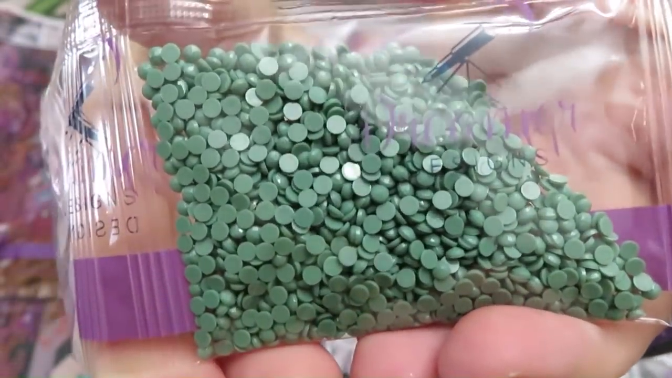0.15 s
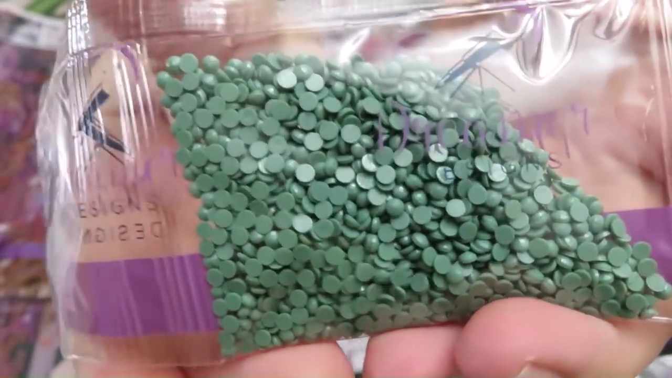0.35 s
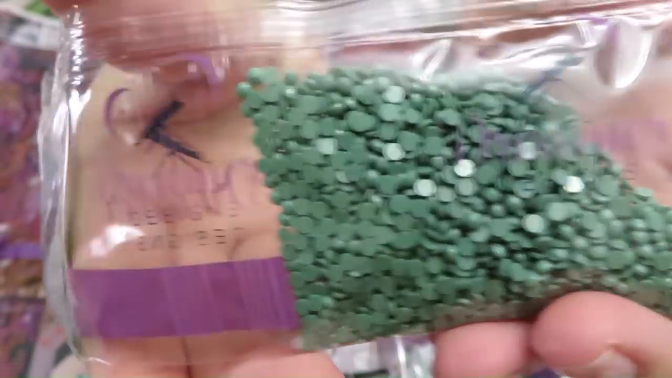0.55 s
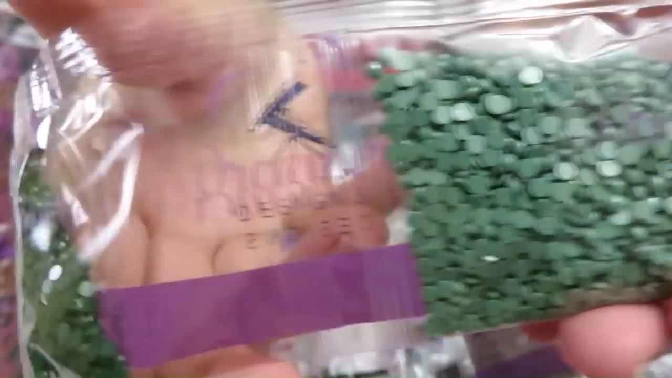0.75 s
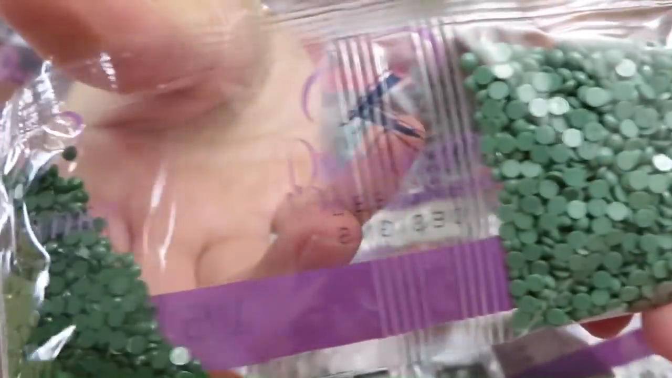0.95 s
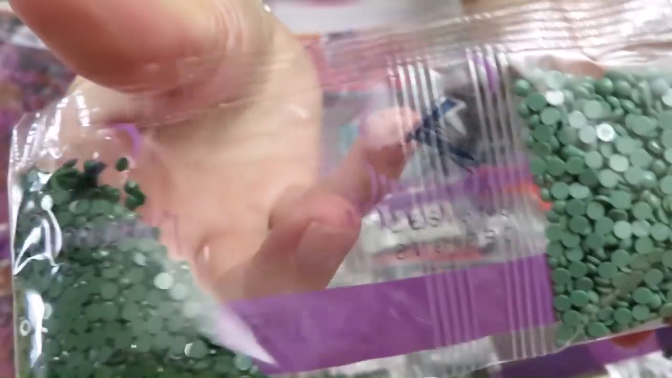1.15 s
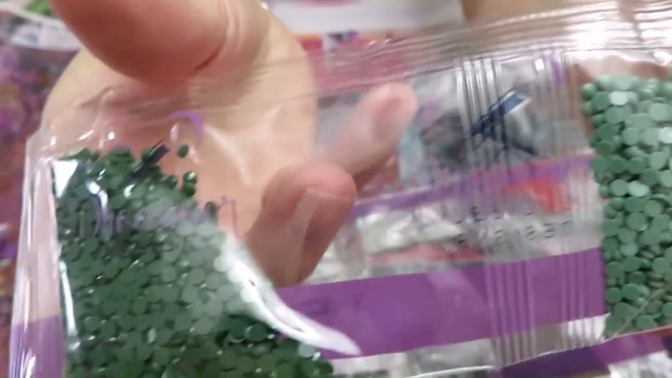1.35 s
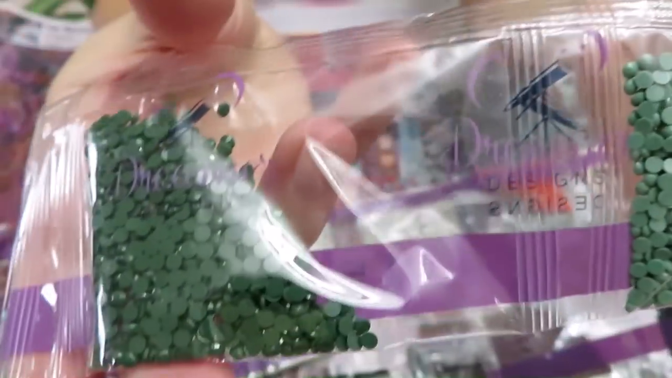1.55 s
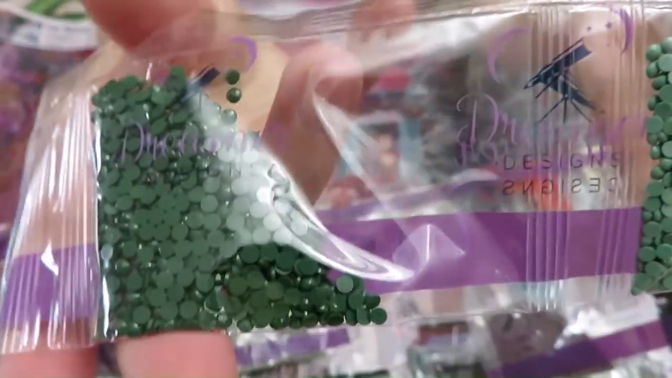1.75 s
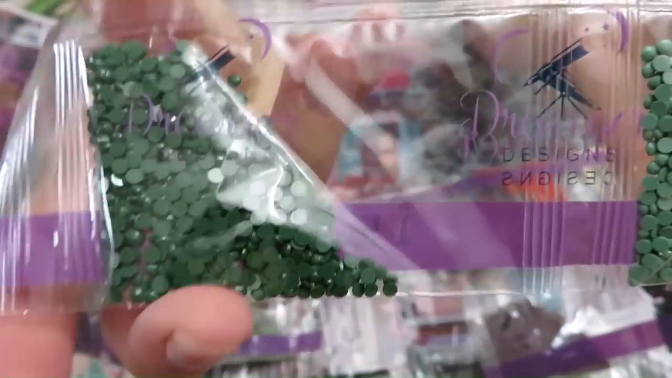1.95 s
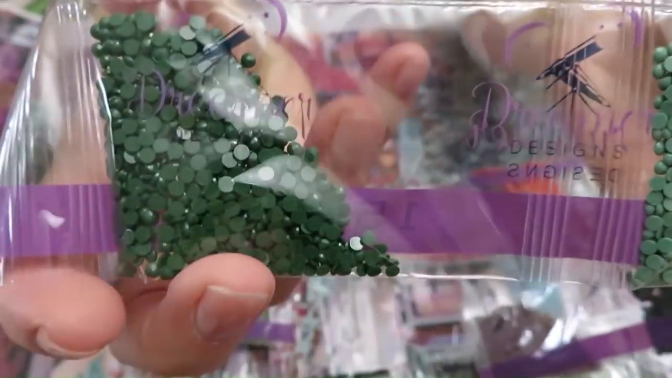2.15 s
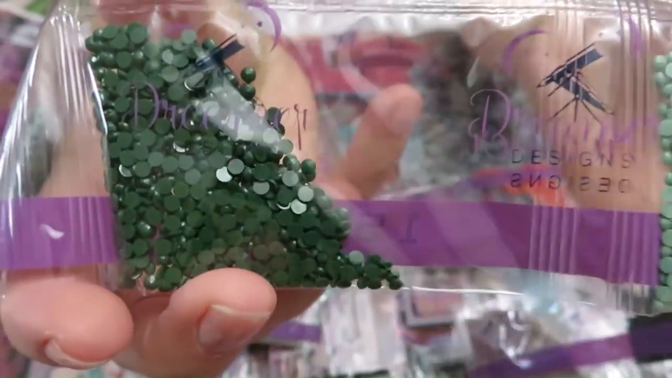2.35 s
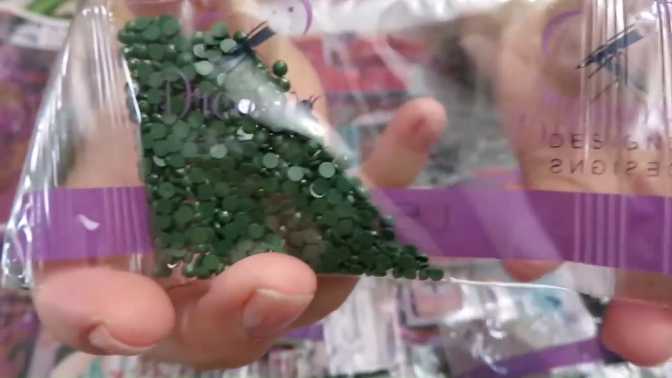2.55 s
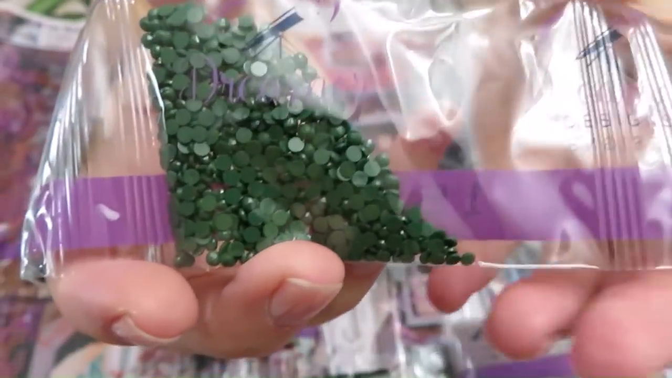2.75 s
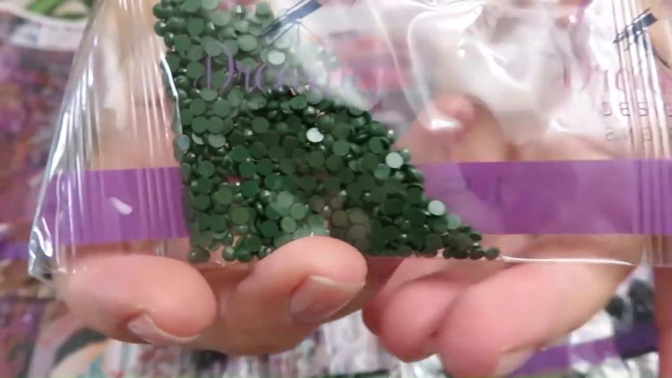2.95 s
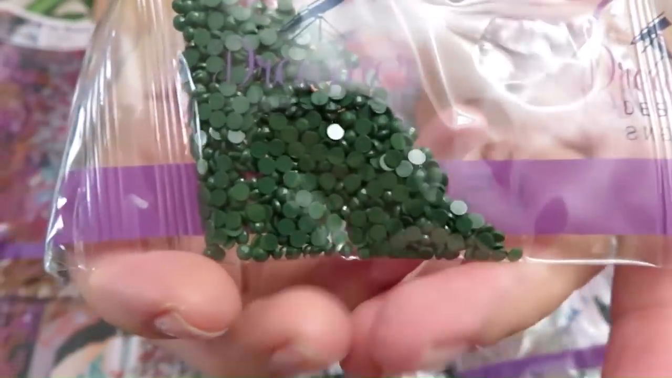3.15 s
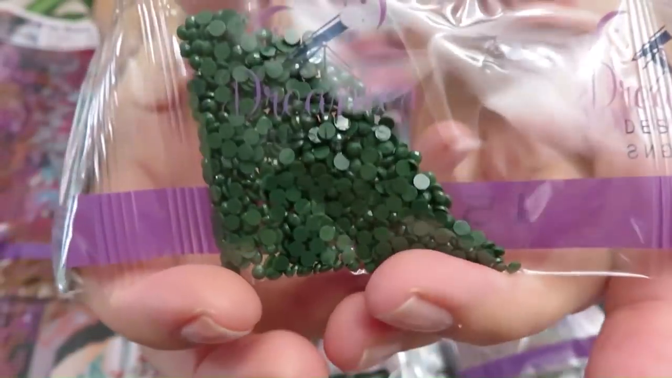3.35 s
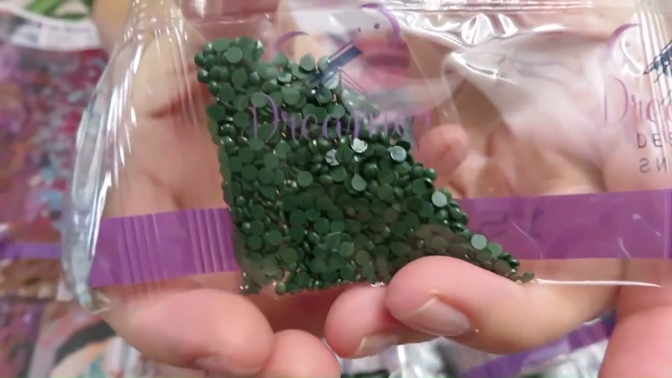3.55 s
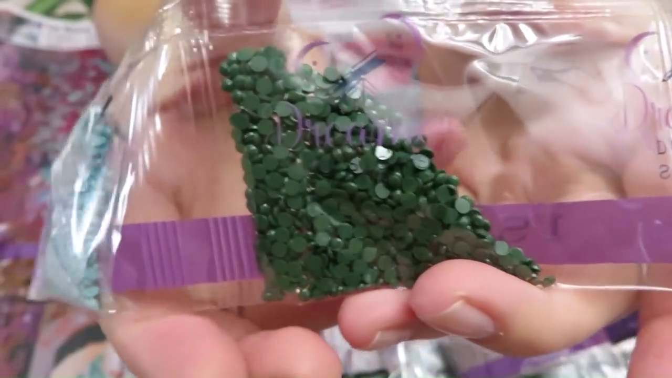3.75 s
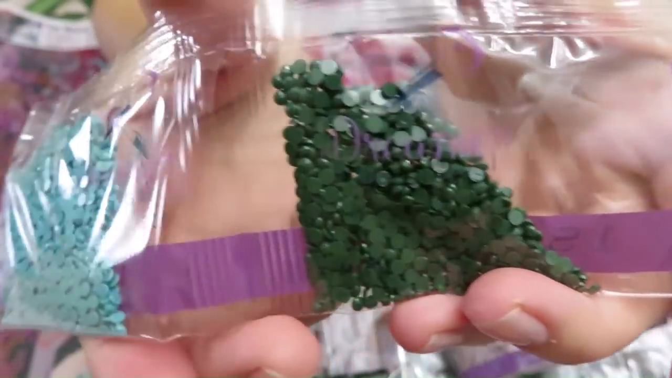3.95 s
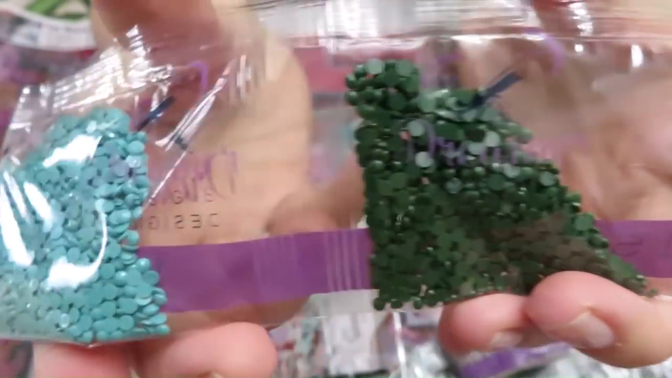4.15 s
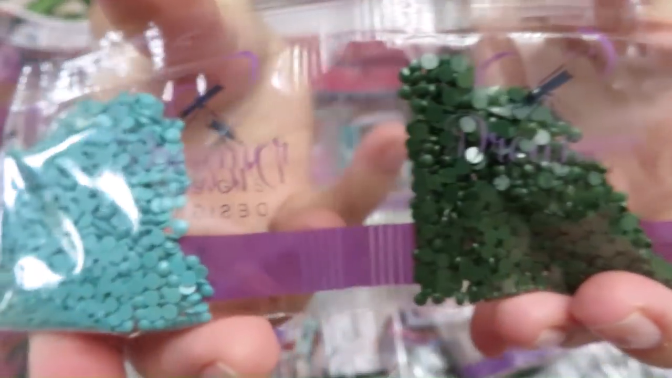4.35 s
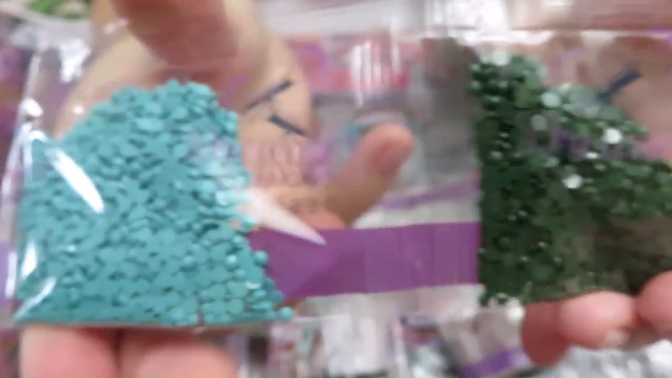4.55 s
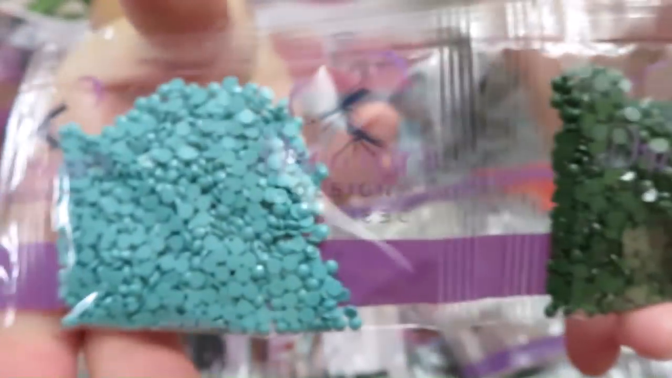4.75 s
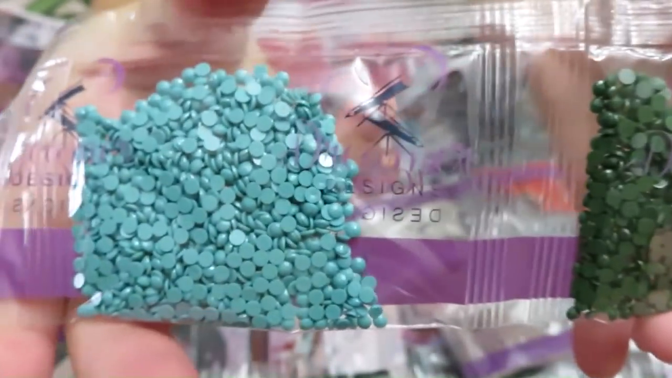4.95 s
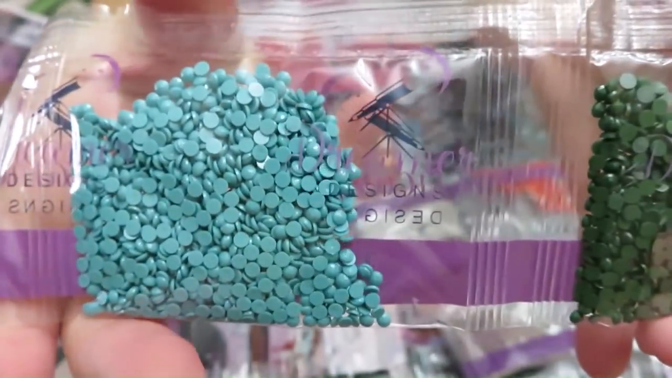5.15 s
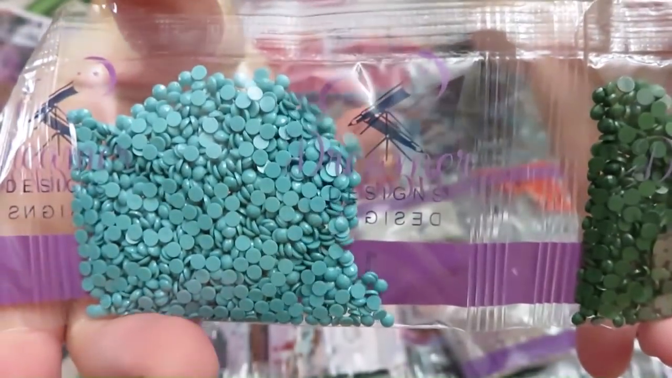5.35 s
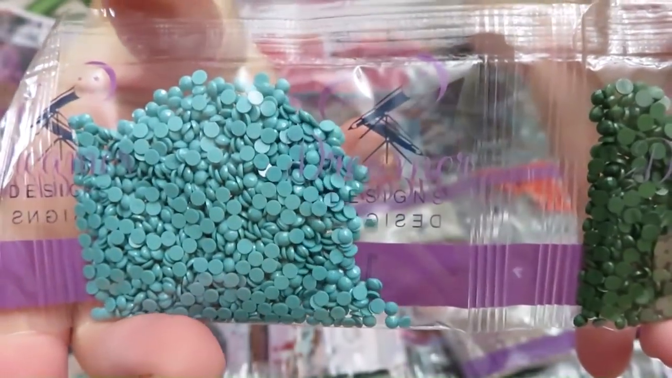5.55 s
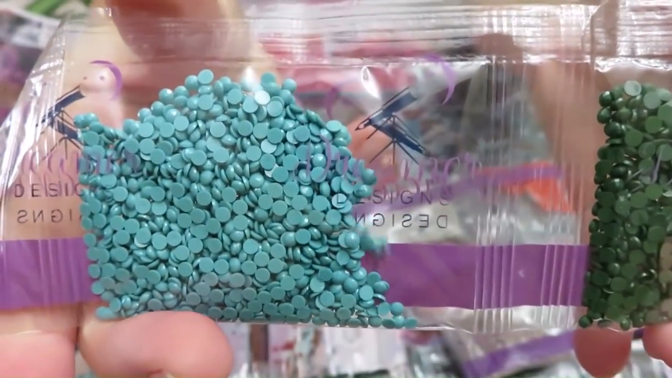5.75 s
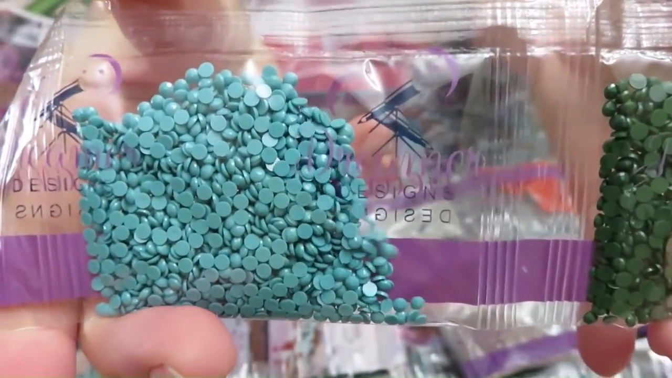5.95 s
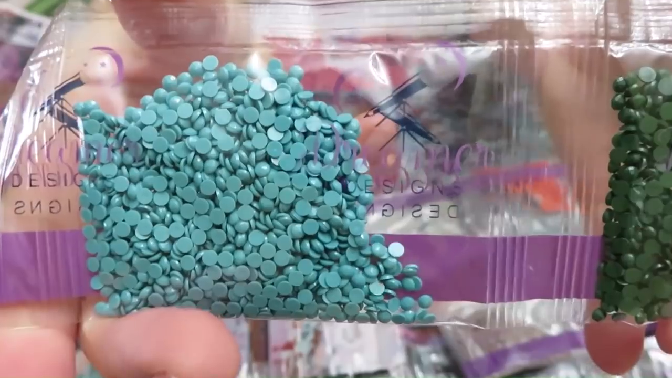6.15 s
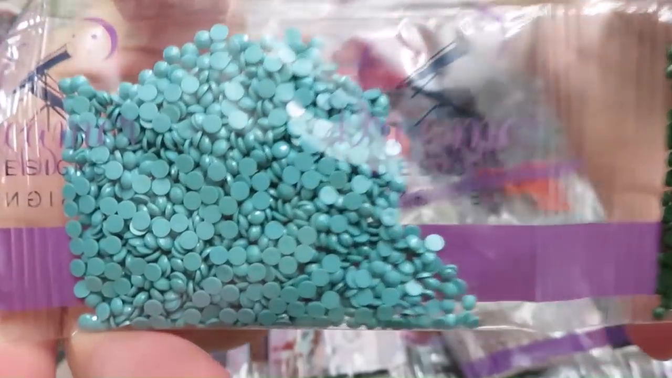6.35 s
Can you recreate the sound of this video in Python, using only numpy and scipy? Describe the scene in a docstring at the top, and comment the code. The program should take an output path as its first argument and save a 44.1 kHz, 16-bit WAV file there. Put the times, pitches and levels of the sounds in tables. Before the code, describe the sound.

Very close to the microphone, a hand pulls along a strip of thin plastic bags holding tiny resin beads. The film snaps and crackles in dense, irregular bursts, with sharp ticks, short hollow pops and soft thuds, and the beads hiss and patter faintly. It is busiest during the first three seconds, eases, flares briefly near four, then thins to isolated ticks in a small quiet room.

```python
"""Sharp ticks, short pops and soft thuds come first: creases snap through in a strip of small clear plastic bags.
The bags, filled with resin beads, are pulled along by hand close to a phone; each snap excites damped modes.
With each stroke of the hand the film crackles and the beads slide, as random impulses set resonances ringing.
Decaying noise gives the reply of a small room, above coloured noise for its air and a sine for a faint mains hum."""
import sys
import numpy as np
from scipy import signal
from scipy.fft import rfft, irfft
from scipy.io import wavfile
from scipy.ndimage import uniform_filter1d

SR = 44100
rng = np.random.default_rng(int(sys.argv[2]) if len(sys.argv) > 2 else 0)


def put_to_file(sound):
    """Save the sound as 16-bit audio at rate SR, in the file named by the first command-line argument."""
    columns = np.atleast_2d(sound).T  # one column per channel
    safe = np.clip(columns, -1, 1)
    whole_steps = np.round(safe * 32767)
    wavfile.write(sys.argv[1], SR, whole_steps.astype(np.int16))


N = 282522
TIME = np.arange(N) / SR  # s, whole scene
AGE = np.arange(2048) / SR  # s, one short sound
# reference length for burst levels, and run-up of faint noise before a tick's crack, which falls with its pop
SNAP_SECONDS = .005


def undb(db):
    """Level and amplitude: 20 dB is a factor of ten in gain."""
    return 10 ** (np.asarray(db) / 20)


def unit(x):
    """Normalisation: division by the root mean square gives rms 1."""
    return x / np.sqrt(np.mean(x ** 2))


def burst(x, db):
    """Energy level: the energy of a short sound, spread over the reference length, is scaled to this level."""
    energy = np.mean(np.sum(x ** 2, axis=-1))
    return x * undb(db) * np.sqrt(SNAP_SECONDS * SR / energy)


def add(out, sound, s):
    """Superposition: a short sound is summed in at its time."""
    start = max(int(s * SR), 0)
    part = sound[..., :N - start]
    out[:, start:start + part.shape[-1]] += part


def convolve(x, response):
    """Linear system: each sample of x launches the response; the length is kept."""
    return signal.oaconvolve(np.atleast_2d(x), np.atleast_2d(response), axes=-1)[:, :x.shape[-1]]


def colour(x, points, size=2048):
    """Minimum phase: a folded cepstrum turns a curve through (f/Hz, level/dB) into a causal filter."""
    hz, db = np.transpose(points)
    bins = np.maximum(np.fft.rfftfreq(size, 1 / SR), 1)
    gain = undb(np.interp(np.log(bins), np.log(hz), db))
    cepstrum = irfft(np.log(gain))
    cepstrum[1:size // 2] *= 2
    cepstrum[size // 2 + 1:] = 0
    return convolve(x, irfft(np.exp(rfft(cepstrum))))


def highpass(x, hz):
    """Second-order high-pass: response falls by 12 dB per octave well below hz."""
    return signal.sosfilt(signal.butter(2, hz, "high", fs=SR, output="sos"), x)


def resonate(x, hz, q):
    """Resonance: a band-pass with gain 1 at its centre and a quality factor of at least 1."""
    return signal.lfilter(*signal.iirpeak(hz, max(q, 1), fs=SR), x)


def ring(hz, t60):
    """Modal decay: a struck mode is a sine that falls by 60 dB in t60 seconds."""
    return np.sin(2 * np.pi * hz * AGE) * np.exp(-np.log(1000) * AGE / t60)


def stereo(mid, side, side_db):
    """Mid-side stereo: left and right share one part and carry the other in opposition."""
    return mid + undb(side_db) * side * np.array([[1], [-1]])


def clicks(rate, spread_db):
    """Random impulse train: many small and a few large impulses, rate per second, at rms 1."""
    place, strength, side = rng.random((int(rate * N / SR), 3)).T
    size_db = spread_db * np.minimum(-np.log(1 - strength), np.pi)
    out = np.zeros(N)
    out[(place * N).astype(int)] = np.sign(side - .5) * undb(size_db)
    return unit(out)


# spectrum of the quiet room air: f/Hz, relative level/dB
AIR_SPECTRUM = [(20, -2.5), (45, -9), (90, -4.5), (140, 1), (220, -4), (400, -6.5), (800, -12.5),
                (2000, -14), (6000, -23), (12000, -32), (16000, -42)]
AIR_DB = -50.5
HUM_HZ, HUM_DB = 124.2, -64


def background():
    """Diffuse noise: room air is alike on both sides in the bass; a steady sine is the mains hum."""
    mid, side = rng.standard_normal((2, N))
    air = unit(colour(stereo(mid, highpass(side, hz=230), side_db=-0.5), AIR_SPECTRUM))
    hum = unit(np.sin(2 * np.pi * HUM_HZ * TIME))
    return undb(AIR_DB) * air + undb(HUM_DB) * hum


# colour of the room's reply: f/Hz, relative level/dB
ROOM_SPECTRUM = [(80, -9.5), (300, -4), (700, -1), (1300, -4), (2100, -2.5), (4000, 1), (9000, 1),
                 (16000, -8)]


def room(x, t60=0.46, treble_t60=0.26, treble_hz=5000, wet_db=-11, near_s=0.014, near_db=3):
    """Reverberation: early returns from hands and table, then a furnished room's tail whose treble dies first."""
    t = np.arange(SR // 2) / SR
    noise = stereo(*rng.standard_normal((2, len(t))), side_db=-34.0)
    # filtered forwards and backwards, so that the treble subtracts in phase
    treble = highpass(highpass(noise, treble_hz)[:, ::-1], treble_hz)[:, ::-1]
    low_tail = (noise - treble) * np.exp(-np.log(1000) * t / t60)
    treble_tail = treble * np.exp(-np.log(1000) * t / treble_t60)
    near = undb(near_db) * noise * np.exp(-t / near_s)
    onset = 1 - np.exp(-t / 0.00017)
    response = colour((low_tail + treble_tail + near) * onset, ROOM_SPECTRUM)
    response = response / np.sqrt(np.sum(response ** 2) / 2)
    return undb(wet_db) * convolve(x.mean(axis=0), response)


def gesture(start, end, attack_s, release_s):
    """Exponential envelope: effort builds up, holds and dies away with these time constants."""
    attack = 1 - np.exp(-np.maximum(TIME - start, 0) / attack_s)
    return attack * np.exp(-np.maximum(TIME - end, 0) / release_s)


# movements of the hand: start t/s, end t/s, film flexing level/dB, beads sliding level/dB (before the mix in scene)
HAND_STROKES = [(0, 0.027, -39, -49), (.04, 0.103, -45, -60), (0.188, 0.255, -40, -56),
                (0.32, 0.427, -55, -50.5), (0.496, 0.836, -37.5, -42.5), (0.887, 1.198, -34.5, -43.5),
                (1.34, 1.475, -36.5, -45.5), (1.527, 1.71, -42.5, -44), (1.7, 2.101, -39, -45),
                (2.279, 2.56, -36, -42), (2.587, 2.89, -37.5, -38), (2.927, 3.2, -42.5, -45.5),
                (3.31, 3.498, -51, -59), (3.64, 3.992, -50, -51.5), (4.01, 4.119, -36.5, -41),
                (4.166, 4.232, -41.5, -46.5), (4.402, 4.533, -46, -53), (4.576, 4.8, -42, -48.5),
                (4.838, 4.948, -46.5, -52), (5.038, 5.143, -42.5, -48.5), (5.34, 5.374, -44, -51),
                (5.42, 5.595, -57.5, -58), (5.779, 6.06, -47.5, -51.5)]
# the grip, never quite still, loosens: t/s, film flexing level/dB, beads sliding level/dB (before the mix in scene)
RESTING_GRIP = [(0, -52, -54), (3.9, -51.5, -59.5), (5.5, -60, -61.5), (6.4, -62, -67)]
STROKE_ATTACK_S, STROKE_RELEASE_S = 0.0095, 0.037  # time constants
SETTLE_DB, SETTLE_S = -20.5, 0.019  # flexing after a snap: level relative to its pop, time constant


def handling():
    """Power addition: resting grip, strokes of the hand and settling after snaps sum as squared amplitudes."""
    times, *levels = np.transpose(RESTING_GRIP)
    flex, slide = (undb(np.interp(TIME, times, db)) ** 2 for db in levels)
    for start, end, flex_db, slide_db in HAND_STROKES:
        effort = gesture(start, end, STROKE_ATTACK_S, STROKE_RELEASE_S)
        flex = flex + (undb(flex_db) * effort) ** 2
        slide = slide + (undb(slide_db) * effort) ** 2
    jolts = np.zeros(N)
    for s, panel_db, *_ in CREASES:
        jolts[int(s * SR)] = undb(panel_db + SETTLE_DB)
    settling = signal.lfilter([1], [1, -np.exp(-1 / (SETTLE_S * SR))], jolts)
    return np.sqrt(flex + settling ** 2), np.sqrt(slide)


def catching(hold_s=.009, depth_db=1.73):
    """Stick-slip: the film sticks and lets go, so its rustle comes in uneven spurts; a gain of rms 1."""
    hold = int(hold_s * SR)
    steps = np.repeat(rng.standard_normal(N // hold + 1), hold)
    smooth = uniform_filter1d(steps, hold // 2)[:N]
    return unit(undb(depth_db * smooth))


# spectrum of fingertips on pouches: f/Hz, relative level/dB
RUB_SPECTRUM = [(40, -27), (80, -14.5), (150, -2), (260, 2.5), (420, 5), (650, -3.5), (1100, -3.5),
                (3000, -49)]


def fingers():
    """Low-frequency friction: fingertips push and drag the heavy pouches in dense, soft, low bumps."""
    mid, side = (colour(clicks(rate=450, spread_db=4.0), RUB_SPECTRUM) for _ in range(2))
    return unit(stereo(mid, side, side_db=-12))


# fingers knocking and gripping the pouches: t/s, level/dB, pitch f/Hz
POUCH_KNOCKS = [(1.271, -33, 175), (1.455, -35, 200), (1.537, -33, 151), (2.538, -44, 80), (2.691, -37, 80),
                (2.728, -38, 107), (2.944, -37.5, 119), (2.96, -35, 121), (3.034, -38, 141)]


def bumps(cycles=5.0):
    """Heavy damping: a whole pouch jolts in the hand with a dull knock that dies within a few cycles."""
    out = np.zeros((2, N))
    for s, db, hz in POUCH_KNOCKS:
        knock = highpass(ring(hz, cycles / hz), hz=.6 * hz)
        add(out, burst(knock, db), s)
    return out


# spectrum of the sliding beads: f/Hz, relative level/dB
SLIDE_SPECTRUM = [(400, -24), (1200, 1), (2500, 4), (3600, 2), (5800, 0.5), (7500, -2.5), (9500, -4.5),
                  (12000, -4), (14500, -4), (16000, -14)]


def sliding(count=12, contact_s=0.0009):
    """Granular contact: beads tick on each other and the film, each kind of contact with its own brief ring."""
    out = 0
    for hz in np.geomspace(1800, 12000, count):
        noise = rng.standard_normal((2, len(AGE))) * np.exp(-AGE / contact_s)
        mid, side = resonate(noise, hz, q=1)
        contact = stereo(mid, highpass(side, hz=3550), side_db=-3)
        hits = clicks(rate=190, spread_db=4.5)
        out = out + convolve(np.tile(hits, (2, 1)), contact)
    return unit(colour(out, SLIDE_SPECTRUM))


# short slips of film over beads: t/s at the middle, half length t/s, level/dB (hiss_db trims the beads)
FILM_SLIPS = [(.747, 0.0044, -27), (1.262, 0.0065, -28.5), (1.457, 0.0038, -31), (2.693, 0.0056, -27.5),
              (2.712, 0.0062, -29.5), (2.73, 0.0082, -27.5), (3.848, 0.001, -37), (4.039, 0.0051, -42),
              (5.891, 0.0061, -36)]


def scrapes(film_db=0, hiss_db=-1):
    """Dense impulses merge into noise: the film slips in a spurt, its contacts too close to tell apart."""
    swell = sum(undb(db) * np.exp(-((TIME - s) / half_s) ** 2) for s, half_s, db in FILM_SLIPS)
    film = unit(resonate(clicks(rate=4800, spread_db=2.0), hz=1590, q=1))
    hiss = stereo(*rng.standard_normal((2, N)), side_db=-2)
    beads = unit(colour(hiss, TICK_SPECTRUM))
    return swell * (undb(film_db) * film + undb(hiss_db) * beads)


def crackle(count=24, tick_db=-12, tick_spread_db=2.5):
    """Superposed small snaps: tiny creases in panels of different sizes each give a small pop and tick."""
    out = 0
    for hz in np.geomspace(1150, 2800, count):
        kink_db = tick_db + tick_spread_db * rng.standard_normal()
        panel = burst(ports(pop(hz), lag_s=3.2e-5), 0)
        kink = burst(tick(tick_pitch(kink_db), 0), kink_db)
        hits = clicks(rate=17, spread_db=5.0)
        out = out + convolve(np.tile(hits, (2, 1)), panel + kink)
    return unit(out)


def ports(x, lag_s=1.8e-5):
    """Arrival-time difference: a panel to one side reaches one microphone sooner, as a scaled derivative."""
    difference = lag_s * SR / 2 * rng.standard_normal() * np.gradient(x, axis=-1)
    return stereo(x, difference, side_db=-4.0)


def stutter(x, span_s, slip_db, count=3):
    """Stepwise buckling: a crease gives way in a main jump and a few weaker slips."""
    steps = np.zeros(len(AGE))
    slots = (rng.random(count) * span_s * SR).astype(int)
    steps[slots] = undb(slip_db) * rng.standard_normal(count)
    steps[0] = 1
    return convolve(x, steps)


# resonances of the bags that every pop stirs: f/Hz, decay by 60 dB t/s, mean-square level/dB before the high-pass
BAG_RESONANCES = [(950, 0.024, -27.5), (1420, 0.027, -22), (1857, 0.031, -24), (2179, 0.032, -30),
                  (2300, 0.017, -24.5), (3367, 0.01, -21)]


def pop(hz, t60=0.0034, rise_s=0.00037, overtone_db=-9, undertone_db=-10, leak_hz=650):
    """Snap-through: a flipping panel excites damped modes and the bags; being small it radiates little bass."""
    damping, upper, lower = np.exp(0.28 * rng.standard_normal(3))
    panel = ring(hz, t60 * damping)
    panel += undb(overtone_db) * ring(1.44 * hz * upper, 0.0042)
    panel += undb(undertone_db) * ring(0.62 * hz * lower, 0.0066)
    bags = sum(undb(db) * rng.standard_normal() * ring(f, decay) for f, decay, db in BAG_RESONANCES)
    return highpass((panel + bags) * (1 - np.exp(-AGE / rise_s)), leak_hz)


# a crease with a strong tick for its pop is a tight one and sounds higher
TICK_HZ, TICK_OCTAVES_PER_DB, TICK_LOW_HZ, TICK_HIGH_HZ = 8050, 0.1, 4350, 9000


def tick_pitch(tightness_db):
    """Tension and pitch: a tick sounds higher the further it stands above its pop, within limits."""
    return np.clip(TICK_HZ * 2 ** (TICK_OCTAVES_PER_DB * tightness_db), TICK_LOW_HZ, TICK_HIGH_HZ)


# spectrum of a tick, also of the beads' hiss in scrapes: f/Hz, relative level/dB
TICK_SPECTRUM = [(600, -0.5), (2000, -5.5), (3500, 3), (5800, -1), (7200, -3), (8900, -2.5), (11500, -2.5),
                 (14500, -2), (16000, -17)]
TICK_Q, TIGHT_TICK_Q = 0.81, 3.6  # ends of the sharpness line, lowest to highest tick; resonate floors it at 1


def kink_colour(x, hz, broad_db=-10):
    """Quality factor: a kink rings over its broad crack, more sharply the tighter and higher it is."""
    q = np.interp(hz, [TICK_LOW_HZ, TICK_HIGH_HZ], [TICK_Q, TIGHT_TICK_Q])
    return colour(resonate(x, hz, q) + undb(broad_db) * x, TICK_SPECTRUM)


def tick(hz, lead_s, crack_s=0.00028, flutter_s=0.0032, flutter_db=-19.5, swell_db=-21, swell_s=0.0018):
    """Transient noise: it swells briefly into a sharp crack, then flutters away; ports differ in the top treble."""
    t = AGE - lead_s
    before = undb(swell_db) * np.exp(-abs(t) / swell_s)
    after = np.exp(-abs(t) / crack_s) + undb(flutter_db) * np.exp(-abs(t) / flutter_s)
    mid, side = rng.standard_normal((2, len(AGE))) * np.where(t < 0, before, after)
    return kink_colour(stereo(mid, highpass(side, hz=7940), side_db=-2.5), hz)


# creases snapping through: t/s, panel pop level/dB, panel pitch f/Hz, tick level/dB, pouch thud level/dB
# (levels before the trims pop_db, tick_db and thud_db)
CREASES = [(0.01, -29.5, 1460, -40, -45), (.0596, -20, 1450, -32.5, -42), (.103, -27, 1430, -39, -31.5),
           (.1722, -37, 1580, -62, -58), (0.1945, -27.5, 2140, -29.5, -43),
           (0.2213, -17.5, 1780, -36.5, -32), (.2405, -21.5, 1480, -25, -32), (.2905, -36, 1460, -60, -58),
           (0.344, -27, 1320, -44.5, -34), (.408, -25.5, 1620, -47, -42), (.424, -38, 1600, -56, -53),
           (0.4779, -27, 1340, -35.5, -42), (0.4882, -23.5, 1590, -48, -46), (.5135, -27, 1500, -41, -38),
           (.5191, -21, 1620, -27.5, -28), (0.5321, -22, 1230, -37, -29), (0.5522, -27, 1340, -46, -47),
           (0.6006, -29, 1960, -51, -50), (0.613, -28, 1650, -46, -45), (0.622, -22.5, 1570, -44, -45),
           (0.6282, -23, 1620, -33.5, -40), (.6661, -33, 1690, -30.5, -42), (.6929, -27.5, 1320, -28, -47),
           (0.725, -24, 1550, -26, -30.5), (.745, -24.5, 1840, -30, -31), (0.7558, -25.5, 2060, -46, -47),
           (0.769, -25.5, 2200, -32, -46), (.8517, -32, 1670, -49, -49), (.913, -18, 1490, -28.5, -26.5),
           (0.9511, -26.5, 1840, -50, -41), (.9913, -23, 1990, -33, -39), (1.037, -21.5, 2460, -25, -40),
           (1.0645, -23.5, 2540, -30, -42), (1.0714, -32, 3470, -27.5, -46),
           (1.1683, -13.5, 2170, -21.5, -34), (1.1964, -30, 1280, -48, -44),
           (1.238, -28.5, 1600, -39.5, -40), (1.2615, -16, 1770, -38, -26), (1.2697, -18, 2000, -24.5, -22),
           (1.3294, -29, 1370, -44, -38), (1.3775, -20.5, 1770, -30, -51), (1.405, -30, 2130, -36, -43),
           (1.4176, -31, 2050, -27.5, -50), (1.467, -24.5, 1630, -26, -25.5), (1.51, -18, 1590, -35, -27),
           (1.5345, -23.5, 1500, -22, -19.5), (1.5897, -27.5, 1470, -34, -34),
           (1.597, -27, 2310, -31.5, -47), (1.6202, -18, 1820, -23.5, -34.5), (1.6884, -29, 1790, -42, -55),
           (1.72, -27.5, 1710, -29, -43), (1.7307, -28, 1980, -28.5, -43), (1.7736, -20.5, 2220, -37, -43),
           (1.789, -22.5, 1500, -31.5, -37), (1.8141, -26.5, 1170, -36, -35),
           (1.8454, -20, 2030, -25.5, -31), (1.86, -23, 1650, -29, -51), (1.8667, -24, 1350, -31, -27),
           (1.8725, -20.5, 2170, -26.5, -34), (1.915, -31, 1900, -46, -50),
           (1.9264, -22.5, 2330, -26.5, -43), (1.9734, -21.5, 2570, -23.5, -51),
           (1.9851, -14, 2280, -21.5, -25.5), (2.034, -22.5, 1700, -26, -36), (2.045, -30, 1910, -30, -35),
           (2.0534, -37, 2120, -36, -46), (2.0764, -32, 2300, -39, -54), (2.0845, -27, 1910, -32, -32),
           (2.0948, -37, 2210, -33, -54), (2.1168, -27.5, 2020, -38, -48), (2.1437, -27, 1020, -44, -30),
           (2.2631, -30, 1600, -36, -41), (2.2752, -26.5, 1860, -30, -33.5), (2.3156, -25, 1660, -40, -29),
           (2.3341, -23, 2100, -23, -37), (2.3855, -29, 2400, -32, -44), (2.3884, -25.5, 2060, -26, -37),
           (2.4144, -26.5, 1540, -37, -36.5), (2.458, -32, 2900, -40, -50), (2.484, -22.5, 1530, -34, -30),
           (2.5351, -22, 2700, -22, -37), (2.6257, -28.5, 1820, -38, -33), (2.648, -26, 1850, -33.5, -30),
           (2.6785, -28.5, 1500, -52, -41), (2.716, -18, 2170, -24, -30), (2.7284, -22.5, 1490, -23, -33),
           (2.7342, -25, 1730, -29, -36), (2.8962, -21.5, 1690, -38, -31),
           (2.9347, -23.5, 2620, -23.5, -39), (2.9432, -24, 2030, -34, -34),
           (2.9642, -20.5, 1470, -34, -38), (3.034, -31.5, 2800, -38.5, -39),
           (3.0992, -27.5, 1490, -52, -42), (3.12, -24.5, 1600, -43, -41), (3.1285, -31, 1520, -44, -44),
           (3.1604, -25.5, 1620, -38, -42), (3.1845, -34.5, 1540, -49, -29.5),
           (3.2377, -27.5, 1620, -37.5, -47), (3.3559, -52, 1970, -46, -55), (3.3975, -39, 1480, -60, -46),
           (3.4335, -38, 2140, -40.5, -62), (3.5094, -41, 1590, -65, -56), (3.5916, -36.5, 1530, -65, -44),
           (3.6649, -23.5, 1370, -33, -36), (3.737, -20.5, 1950, -27.5, -42),
           (3.7715, -19.5, 1890, -27, -39), (3.783, -19.5, 1600, -25, -38.5),
           (3.8347, -29.5, 1570, -40, -46), (3.8505, -29, 1730, -21.5, -42),
           (3.9942, -27.5, 3400, -33.5, -42), (4.039, -29.5, 1600, -34.5, -50),
           (4.0936, -30.5, 2030, -31.5, -35.5), (4.1277, -36, 1800, -47, -58),
           (4.2053, -24, 1660, -35, -47), (4.216, -20.5, 2440, -32.5, -41),
           (4.4106, -23.5, 1935, -30, -33.5), (4.4834, -36.5, 2000, -43.5, -37),
           (4.501, -27, 1460, -49, -55), (4.59, -31, 2000, -34.5, -39.5), (4.602, -32, 1310, -44, -44),
           (4.6723, -25.5, 1730, -36.5, -47), (4.6903, -23, 1730, -31, -38), (4.758, -55, 3110, -37, -61),
           (4.8115, -39, 2400, -56, -54), (4.847, -33.5, 2370, -36.5, -35.5),
           (4.9073, -31.5, 2210, -34.5, -36.5), (4.9158, -28, 2450, -42, -40.5),
           (5.0455, -33, 2700, -43, -57), (5.0557, -18.5, 2150, -28.5, -43), (5.0922, -27, 2200, -56, -58),
           (5.1185, -34, 2400, -39, -50), (5.1225, -32, 2650, -36.5, -42),
           (5.2706, -34.5, 1620, -42.5, -42), (5.3367, -22, 2000, -19, -32), (5.3392, -25, 1000, -40, -31),
           (5.4424, -44.5, 1500, -46.5, -41.5), (5.6392, -41, 2430, -52, -57),
           (5.6454, -43.5, 2080, -51, -59), (5.7121, -39.5, 3200, -40, -60), (5.81, -43, 2110, -45.5, -60),
           (5.888, -43, 1000, -50, -48), (5.9753, -43, 2010, -49, -60), (6.0145, -41.5, 1920, -51, -62)]


def snaps(pop_db=0, tick_db=2.0, thud_db=-2.2, thud_hz=425, thud_t60=0.014, close_db=-28, closeness=0.45):
    """Direct and reverberant field: each crease gives tick, pop and thud, split into direct and room sound."""
    direct, spread = np.zeros((2, 2, N))
    for s, panel_db, panel_hz, kink_db, pouch_db in CREASES:
        thud = highpass(ring(thud_hz * np.exp(0.22 * rng.standard_normal()), thud_t60), hz=168)
        panel = ports(stutter(pop(panel_hz), span_s=0.0032, slip_db=-13))
        polarity = rng.choice([-1, 1])
        body = polarity * (burst(panel, panel_db + pop_db) + burst(thud, pouch_db + thud_db))
        kink_hz = tick_pitch(kink_db - panel_db)
        kink = stutter(tick(kink_hz, SNAP_SECONDS), span_s=.002, slip_db=-12.5)
        add(direct, body, s)
        # started early by its run-up, so that the crack meets the pop
        add(direct, burst(kink, kink_db + tick_db), s - SNAP_SECONDS)
        # summed over all directions, the ragged colour of a single tick evens out
        even_tick = kink_colour(signal.unit_impulse(len(AGE)), kink_hz, broad_db=-5)
        # the loudest creases are those nearest the microphone, so they sound drier
        dry_db = closeness * max(max(panel_db, kink_db) - close_db, 0)
        room_tick = burst(even_tick, kink_db + tick_db - dry_db)
        add(spread, undb(-dry_db / 2) * body + room_tick, s)
    return direct, spread


def scene(crackle_db=-2, beads_db=0.2, fingers_db=-12.0):
    """Superposition of sources: snaps, scrapes and bumps over the rustle of the handled bags, in the room."""
    flex, slide = handling()
    film = flex * (undb(crackle_db) * crackle() + undb(fingers_db) * fingers())
    beads = slide * undb(beads_db) * sliding()
    handled = scrapes() + bumps() + (film + beads) * catching()
    direct, spread = snaps()
    return direct + handled + room(spread + handled) + background()


def record(dry, top_hz=16200):
    """Limits of the channel: the phone clips at full scale and cuts the top with a steep low-pass."""
    low_pass = signal.ellip(8, .2, 70, top_hz, fs=SR, output="sos")
    return signal.sosfilt(low_pass, np.clip(dry, -1, 1))


dry = scene()
out = record(dry)
put_to_file(out)
```